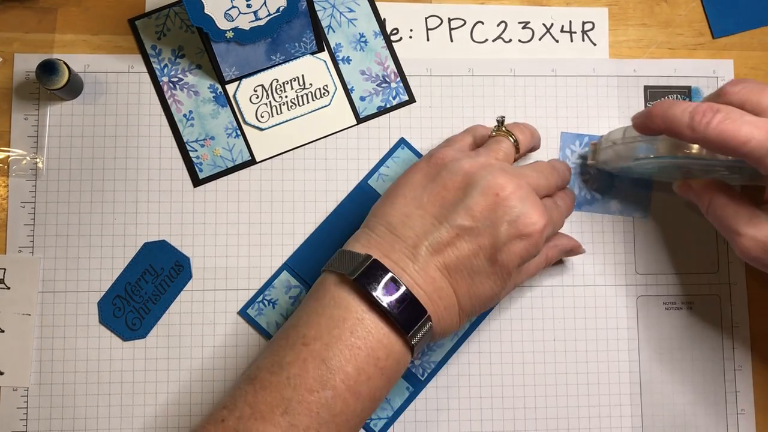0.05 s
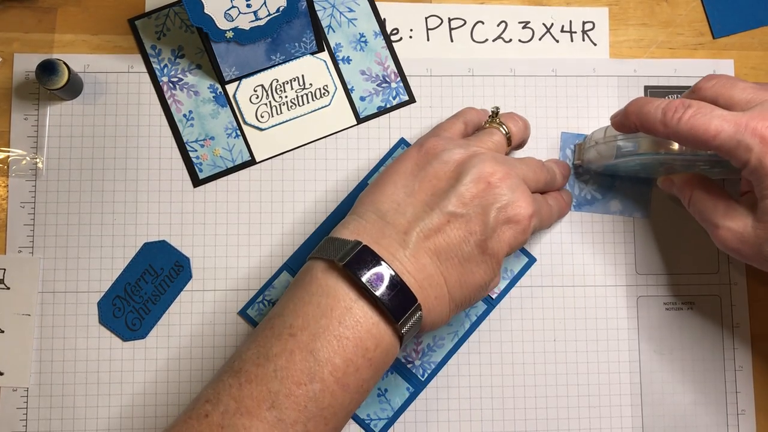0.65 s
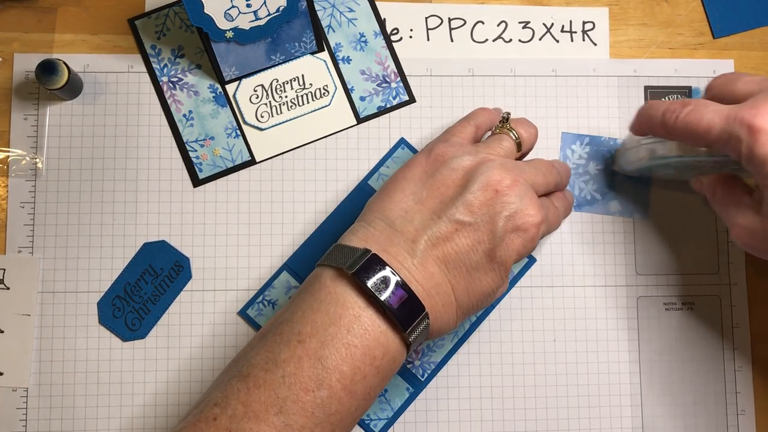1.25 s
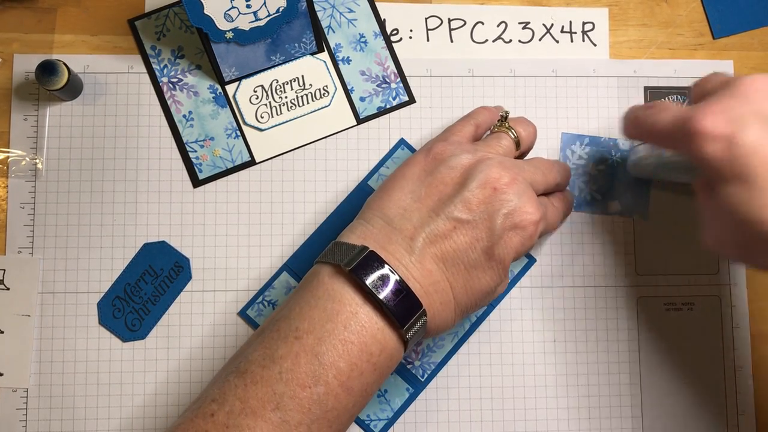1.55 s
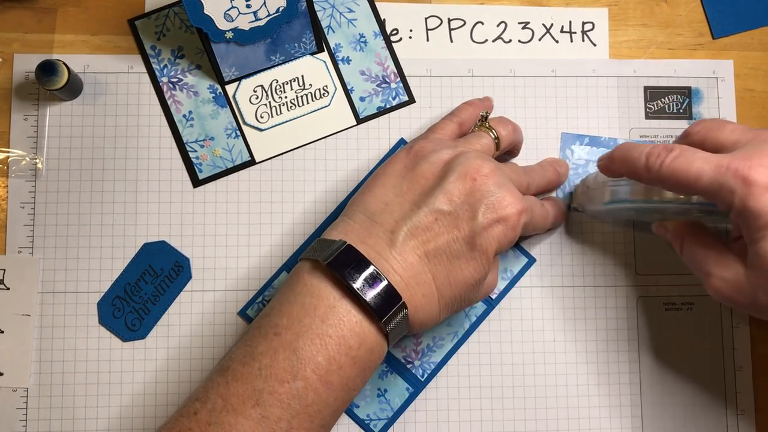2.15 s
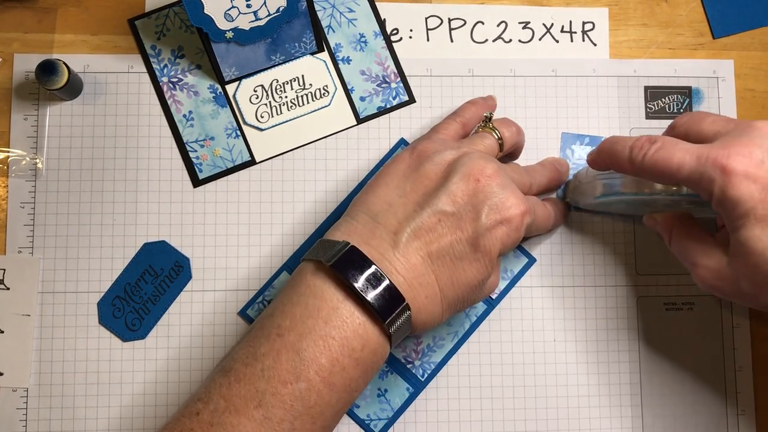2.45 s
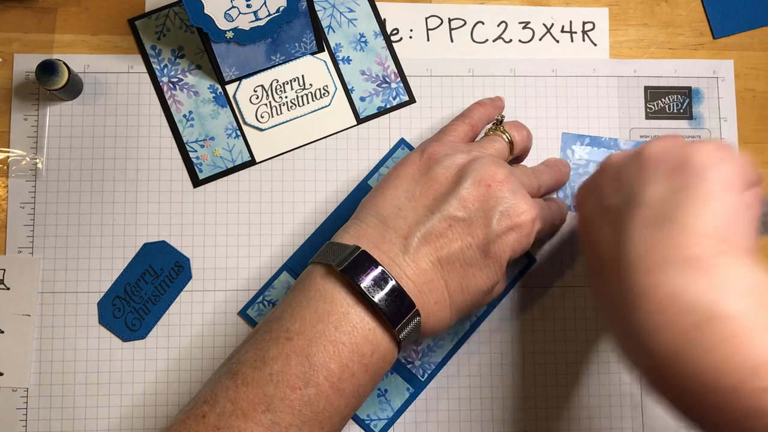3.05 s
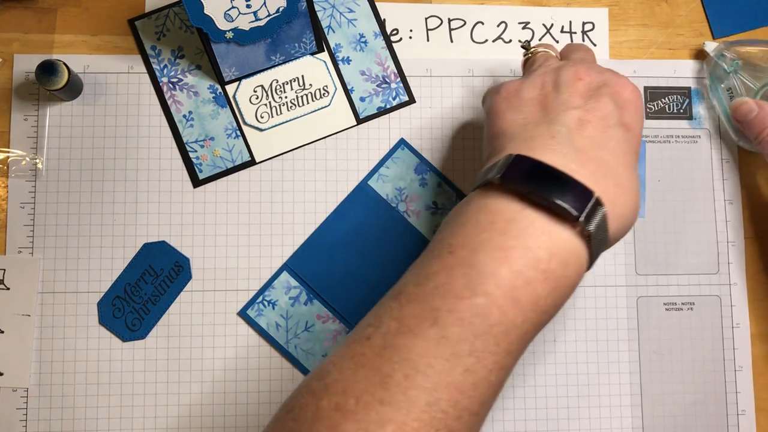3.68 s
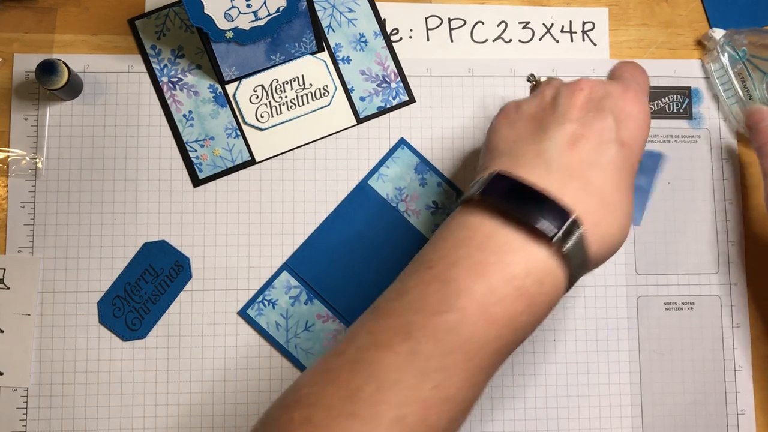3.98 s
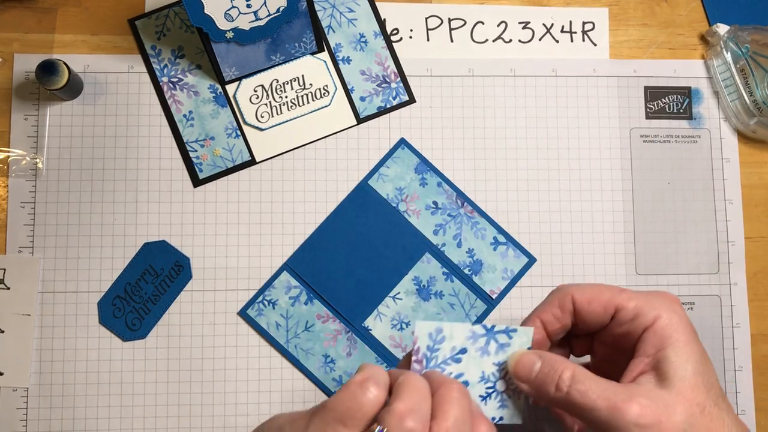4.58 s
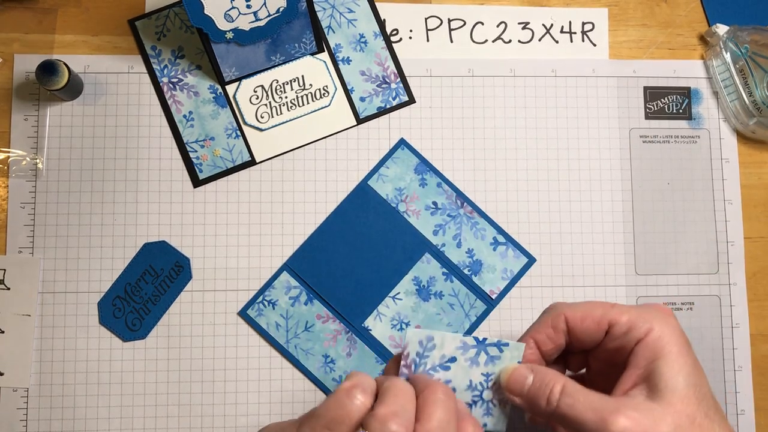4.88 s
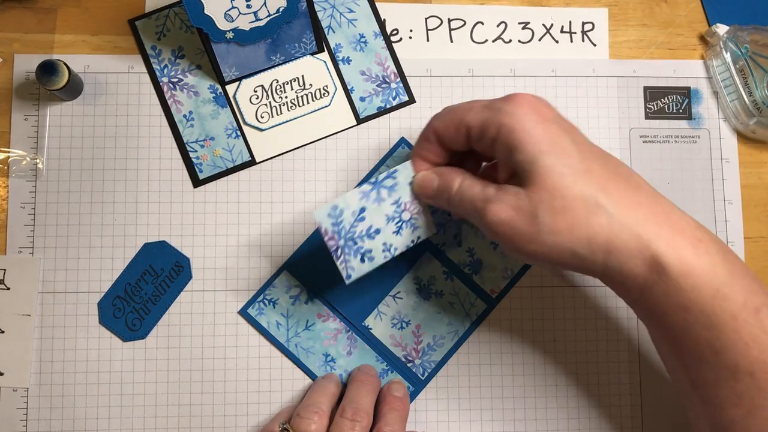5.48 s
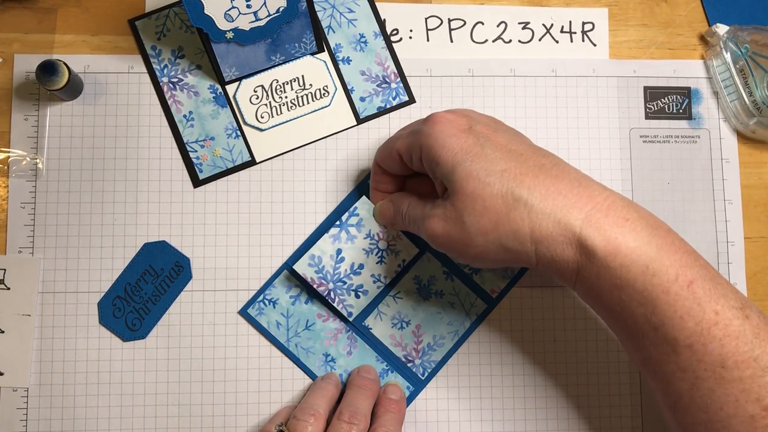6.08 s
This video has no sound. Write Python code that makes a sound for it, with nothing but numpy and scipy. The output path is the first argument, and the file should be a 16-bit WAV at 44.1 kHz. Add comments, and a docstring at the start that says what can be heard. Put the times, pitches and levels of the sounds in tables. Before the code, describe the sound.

A low ventilation hum and faint hiss fill a small quiet room throughout. A very faint, high electrical whine comes on at 0.2 seconds, jumps in pitch, then stays. At about 1.1 seconds a plastic tape runner meets a slip of paper with a soft hollow tock, and glue crackles briefly while the spool ticks. A few sharp little clicks follow around 1.6 seconds. A second, softer stroke comes at 2.5 seconds, then small clicks and a brush of paper at 3. At 3.6 seconds there is a knock on the wooden desk, and just before 4 seconds the runner is put down with a sharp hollow clatter, the loudest sound, rocking briefly. From about 4.5 seconds the paper slides softly in the fingers, flicks at 4.9 and touches down on a card with a light tap at 5.4. Only the background remains until about 6.5 seconds.

```python
"""Card making at a wooden desk in a small quiet room, over ventilation hum and faint hiss.
A faint electrical whine comes on, switches pitch, then stays. At 1.1 s and 2.5 s a plastic tape runner
is drawn over a slip of paper: the tip tocks, glue crackles off the tape, the spool ticks.
From 3.6 s the runner is laid down with a knock on the desk and a clatter of its hollow shell.
Last, the slip is slid off the mat, turned in the fingers and, at 5.4 s, touched down on a card."""
import sys
import numpy as np
from scipy import signal
from scipy.fft import rfft, irfft, next_fast_len
from scipy.io import wavfile
from scipy.ndimage import uniform_filter1d

SR = 44100
rng = np.random.default_rng(int(sys.argv[2]) if len(sys.argv) > 2 else 0)


def bounce(signal):
    """Save signal as a 16-bit WAV file at the path given by the first command-line argument."""
    frames = np.transpose(np.atleast_2d(signal))
    limited = np.clip(frames, -1, 1)
    pcm = np.round(limited * 32767).astype(np.int16)
    wavfile.write(sys.argv[1], SR, pcm)


N = 279153
TIME_S = np.arange(N) / SR

# noise spectra: freq_hz, density_db
VENT_SPECTRUM = [(20, -25), (35, -21.5), (48, -2), (59, 0), (78, -7), (112, -6), (145, -16.5), (260, -20.5),
                 (340, -26.5), (520, -26.5), (950, -21), (2000, -30.5), (2900, -36), (5000, -46),
                 (16000, -74.5)]
HISS_SPECTRUM = [(1000, -4.5), (4900, -7), (5600, 2.5), (7700, -2), (8700, 2.5), (9900, 0), (10500, -9),
                 (11300, -3.5), (12600, 2.5), (16000, -1.5)]
SLIDE_SPECTRUM = [(300, -3.5), (1500, 2.5), (4000, -2.5), (7000, 0), (10000, -4.5), (16000, -10)]
PEEL_SPECTRUM = [(150, 4.5), (450, 2), (1000, -16.5), (2500, -3.5), (4300, -7.5), (6300, -1.5), (10000, -5),
                 (16000, -7)]
# electrical whine steps: start_s, pitch_hz
WHINE_STEPS = [(0.191, 15400), (.283, 12100), (.368, 15400), (.454, 11350)]
# room decay: freq_hz, t60_s
ROOM_DECAY = [(100, 0.51), (500, 0.43), (2000, 0.322), (6000, .35), (15000, 0.41)]
# room tail spectrum: freq_hz, gain_db
ROOM_SPECTRUM = [(80, 8.5), (400, -5.5), (1500, -2), (4000, -7.5), (8000, -14), (16000, -14)]

# paper and skin sliding: centre_s, length_s, level_db
SLIDES = [(0.24, 0.042, -74), (1.913, 0.072, -74), (3.023, 0.0206, -52), (3.327, 0.117, -72.5),
          (3.416, 0.0158, -59), (3.677, 0.045, -59.5), (3.892, 0.114, -61), (4.473, 0.0643, -65.5),
          (4.613, 0.032, -71.5), (4.707, 0.027, -72), (4.923, .029, -66), (5.456, 0.0266, -63.5)]
# runner drawn over the paper: start_s, length_s, level_db
STROKES = [(1.148, 0.177, -62.5), (2.538, 0.238, -72)]
# impacts: start_s, level_db, lowpass_hz
PAPER_FLICKS = [(4.9212, -52.5, 9000), (4.9242, -56.5, 8900), (5.4272, -44, 4595), (5.4445, -52.5, 2470)]
SHELL_CLACKS = [(1.1684, -41.5, 5540), (1.1827, -49, 3100), (1.613, -53.5, 2600), (3.9023, -49, 5000),
                (3.9362, -40.5, 3500), (3.9475, -17, 11100), (3.9535, -30, 14000), (3.9702, -30, 8000),
                (3.9893, -33.5, 5440), (4.0468, -34, 6500), (4.1038, -40.5, 6340)]
DESK_KNOCKS = [(3.5572, -26.5, 4997), (3.5755, -39, 896), (3.7, -39, 1140), (3.9495, -35, 2000),
               (4.0035, -29, 1576)]
TIP_PRESSES = [(1.1416, -39, 2500), (1.172, -48, 1470), (1.6262, -60.5, 2490), (2.6072, -59, 1500),
               (3.0285, -52.5, 1500)]   # onto and off the mat
RUNNER_TICKS = [(.907, -56.5, 8970), (1.1562, -54.5, 10900), (1.4083, -55.5, 13700), (1.5377, -54, 14000),
                (1.5997, -54, 7900), (1.625, -41, 12870), (1.6277, -43.5, 12800), (1.6364, -45.5, 11000),
                (1.9294, -61, 8950), (2.5083, -52, 17100), (2.5355, -48.5, 15000), (2.6068, -46.5, 7800),
                (3.0183, -51.5, 11000), (3.0336, -48, 8540), (3.5516, -49.5, 8000), (4.1237, -53.5, 14000)]   # spool and tip
# ringing modes: freq_hz, gain_db, t60_s
CARD_MODES = [(740, -17, 0.032), (1530, -7, 0.028), (2853, -0.5, 0.0063), (3980, 4, 0.012)]
SHELL_MODES = [(395, -19, 0.045), (527, -10, 0.06), (1329, -11, 0.035), (1558, -11, 0.027),
               (3932, -4.5, 0.019), (4270, -12.5, 0.021), (5097, -6, 0.017), (5450, -2.5, 0.016),
               (6522, 4, 0.011), (6610, -2, 0.011), (8337, 0.5, .015), (9570, -5, 0.015),
               (11000, -18, 0.029)]
DESK_MODES = [(103.9, -16, 0.1485), (266, -12.5, 0.047), (355.9, -6.5, .08), (495.3, -5.5, 0.07),
              (1194.6, -13, 0.048), (1441, -15.5, 0.036), (2210, -3, .028), (4200, -1.5, 0.01242)]
TIP_MODES = [(440.4, -4.5, 0.057), (544.4, 10.5, 0.0246), (1057, -2, 0.0406)]
SPOOL_MODES = [(2634, -20.5, 0.0053), (5298, -11, 0.022), (6580, 2, 0.00574), (9400, -22.5, 0.0034),
               (11050, -16.5, 0.0025), (14080, -9.5, 0.0044)]
# impact crack spectra: freq_hz, density_db
CARD_CRACK = [(300, -15.5), (1300, 1.5), (2100, -3), (2800, 1), (4200, -0.5), (6000, 1), (9000, -20),
              (16000, 1)]
SHELL_CRACK = [(150, -14), (450, -3.5), (780, -10.5), (1650, -0.5), (2700, -5.5), (4000, 0.5), (5700, -6.5),
               (6800, -4.5), (8500, -1.5), (10500, -7.5), (16000, -7)]
DESK_CRACK = [(80, -13), (170, -5.5), (330, 4), (520, 2.5), (760, -5.5), (1100, -0.5), (1400, -5),
              (2100, -1), (2900, -7.5), (4000, -2), (5000, -10.5), (9000, -8), (16000, -3.5)]
TIP_CRACK = [(150, -19.5), (500, 0), (1000, 0.5), (2000, -5.5), (3400, -1), (5000, -14), (16000, -20)]
SPOOL_CRACK = [(300, -7), (1500, -9), (3200, -1), (4700, -7), (6200, 0), (8500, 3.5), (12000, 5),
               (16000, 3)]


def from_db(db):
    """Decibels to gain."""
    return 10 ** (np.asarray(db) / 20)


def unit_rms(x):
    """Scale to unit power."""
    return x / np.sqrt(np.mean(x ** 2) + 1e-20)


def at_hz(table, hz):
    """Interpolate a table over log frequency."""
    known_hz, values = np.transpose(table)
    return np.interp(np.log(np.maximum(hz, 1)), np.log(known_hz), values)


def lowpass(x, cutoff_hz):
    """Second-order low-pass."""
    return signal.sosfilt(signal.butter(2, min(cutoff_hz, .45 * SR), fs=SR, output="sos"), x)


def noise(spectrum):
    """Unit-power noise with the given spectrum."""
    size = next_fast_len(N)
    gain = from_db(at_hz(spectrum, np.fft.rfftfreq(size, 1 / SR)))
    return unit_rms(irfft(rfft(rng.standard_normal(size)) * gain, size)[:N])


def background(vent_db, hiss_db):
    """Steady ventilation rumble and faint microphone hiss."""
    return from_db(vent_db) * noise(VENT_SPECTRUM) + from_db(hiss_db) * noise(HISS_SPECTRUM)


def whine(level_db, half_width_hz, leap_hz, pulse_db):
    """Narrow noise band from electronics; pulses at two rates, leaps up in pitch at random."""
    starts_s, steps_hz = np.transpose(WHINE_STEPS)
    pitch_hz = steps_hz[np.searchsorted(starts_s, TIME_S) - 1]
    pulse = np.sin(2 * np.pi * 30 * TIME_S) + np.sin(2 * np.pi * 43 * TIME_S)
    leap = np.maximum(unit_rms(lowpass(rng.standard_normal(N), 70)), 0) ** 2
    phase = 2 * np.pi * np.cumsum(pitch_hz + leap_hz * leap) / SR
    band = lowpass(rng.standard_normal(N), half_width_hz) * np.sin(phase)
    return from_db(level_db) * (TIME_S > starts_s[0]) * unit_rms(band * from_db(pulse_db * pulse))


def room(x, tail_db, build_s, ceiling_s, ceiling_db, ceiling_hz):
    """Direct sound, one ceiling echo and a diffuse tail that lasts longest in the bass."""
    t_s = TIME_S[:SR // 2]
    white = rng.standard_normal((2, len(t_s))) / np.sqrt(SR)
    edges_hz = np.geomspace(60, 17000, 13)
    tail = 0
    for k, (low_hz, high_hz) in enumerate(zip(edges_hz, edges_hz[1:])):
        bandpass = signal.butter(2, [low_hz, high_hz], "band", fs=SR, output="sos")
        centre_hz = np.sqrt(low_hz * high_hz)
        envelope_db = at_hz(ROOM_SPECTRUM, centre_hz) - 60 * t_s / at_hz(ROOM_DECAY, centre_hz)
        tail += signal.sosfilt(bandpass, white[k % 2]) * from_db(envelope_db)
    diffuse = signal.fftconvolve(x, tail * (1 - np.exp(-t_s / build_s)))[:N]
    echo = np.interp(TIME_S - ceiling_s, TIME_S, lowpass(x, ceiling_hz), left=0)
    return x + from_db(tail_db) * diffuse + from_db(ceiling_db) * echo


def crack(spectrum, t60_s, size):
    """Dense, heavily damped modes: a dying noise burst, flattened, then shaped to the spectrum."""
    hz = np.fft.rfftfreq(2 * size, 1 / SR)
    burst = rfft(rng.standard_normal(size) * from_db(-60 * TIME_S[:size] / t60_s), 2 * size)
    local_rms = np.sqrt(uniform_filter1d(np.abs(burst) ** 2, size=size // 50))
    flat = burst / unit_rms(local_rms)
    return irfft(flat * unit_rms(from_db(at_hz(spectrum, hz))))[:size]


def strikes(impacts, modes, crack_spectrum, crack_db, crack_t60_s, rise_s, gain_spread, detune):
    """Each blow cracks and rings every mode; grip and contact point vary mode strength and pitch."""
    t_s = TIME_S[:SR // 4]
    mode_hz, mode_db, t60_s = np.transpose(modes)[:, :, None]
    out = np.zeros(N + len(t_s))
    for start_s, level_db, lowpass_hz in impacts:
        gain = from_db(mode_db) * np.exp(gain_spread * rng.standard_normal(mode_hz.shape))
        gain *= rng.choice([-1, 1], mode_hz.shape)
        pitch_hz = mode_hz * (1 + detune * rng.standard_normal(mode_hz.shape))
        ring = np.sum(gain * np.sin(2 * np.pi * pitch_hz * t_s) * from_db(-60 * t_s / t60_s), axis=0)
        body = ring + from_db(crack_db) * crack(crack_spectrum, crack_t60_s, len(t_s))
        blow = lowpass(body * (1 - np.exp(-t_s / rise_s)), lowpass_hz)   # softer contact, less treble
        rms_5ms = np.sqrt(np.sum(blow ** 2) / (SR // 200))   # whole energy over 5 ms
        start = round(start_s * SR)
        out[start:start + len(t_s)] += from_db(level_db) * blow / rms_5ms
    return out[:N]


def friction(spectrum, slips_per_s, spread_db, puff_t60_s, smooth_db):
    """Tiny uneven slips, each a puff of noise, over a smooth hiss; unit power."""
    slips = (rng.random(N) < slips_per_s / SR) * from_db(spread_db * np.minimum(rng.exponential(1, N), 4))
    puffs = signal.lfilter([1], [1, -from_db(-60 / (puff_t60_s * SR))], slips + 1e-18)
    return unit_rms(noise(spectrum) * (unit_rms(puffs) + from_db(smooth_db)))


def paper():
    """Slides swell and fade with hand speed; the stiff edge flicks and touches down."""
    speed = sum(from_db(level_db) * np.exp(-2 * ((TIME_S - centre_s) / length_s) ** 2)
                for centre_s, length_s, level_db in SLIDES)
    rub = friction(SLIDE_SPECTRUM, slips_per_s=700, spread_db=3.5, puff_t60_s=0.003, smooth_db=0.5)
    flicks = strikes(PAPER_FLICKS, CARD_MODES, CARD_CRACK, crack_db=5.5, crack_t60_s=0.0241,
                     rise_s=0.0001, gain_spread=0.123, detune=0.0147)
    return speed * rub + flicks


def tape_peel(attack_s, grab_db, grab_s, release_db_per_s):
    """Glue crackles hard as it grabs, settles to an even pull, dies away when the hand stops."""
    pull = 0
    for start_s, length_s, level_db in STROKES:
        age_s = np.maximum(TIME_S - start_s, 0)
        boost_db = grab_db * np.exp(-(age_s / grab_s) ** 2)
        release_db = release_db_per_s * np.maximum(age_s - length_s, 0)
        pull += np.minimum(age_s / attack_s, 1) * from_db(level_db + boost_db - release_db)
    return pull * friction(PEEL_SPECTRUM, slips_per_s=600, spread_db=-2, puff_t60_s=0.0027, smooth_db=1.5)


def spool_ratchet(ticks_per_s, above_pull_db, spread_db, lowpass_hz):
    """Impact rows for the spool, ticking unevenly while the tape runs."""
    ticks = []
    for start_s, length_s, pull_db in STROKES:
        lateness, strength = rng.standard_normal((32, 2)).T
        ages_s = (np.arange(1, 33) + lateness / 4) / ticks_per_s
        levels_db = pull_db + above_pull_db + spread_db * strength
        ticks += [(start_s + age_s, level_db, lowpass_hz)
                  for age_s, level_db in zip(ages_s, levels_db) if age_s < length_s]
    return ticks


def tape_runner():
    """The tip lands with a hollow tock; tape peels while the spool ticks."""
    tip = strikes(TIP_PRESSES, TIP_MODES, TIP_CRACK, crack_db=12.5, crack_t60_s=0.0089,
                  rise_s=0.00057, gain_spread=0.146, detune=0.0145)
    peel = tape_peel(attack_s=0.015, grab_db=12, grab_s=0.0538, release_db_per_s=253.5)
    ticks = RUNNER_TICKS + spool_ratchet(ticks_per_s=41, above_pull_db=2.5, spread_db=2, lowpass_hz=10000)
    spool = strikes(ticks, SPOOL_MODES, SPOOL_CRACK, crack_db=8, crack_t60_s=0.0089,
                    rise_s=0.000063, gain_spread=0.18, detune=0.0393)
    return tip + peel + spool


def runner_on_desk():
    """The hollow shell hits and rocks; the desk top answers lower."""
    shell = strikes(SHELL_CLACKS, SHELL_MODES, SHELL_CRACK, crack_db=7, crack_t60_s=0.014,
                    rise_s=0.00028, gain_spread=0.15, detune=0.0065)
    desk = strikes(DESK_KNOCKS, DESK_MODES, DESK_CRACK, crack_db=12, crack_t60_s=0.0243,
                   rise_s=0.00027, gain_spread=0.14, detune=0.008)
    return shell + desk


def scene():
    """Handling sounds in the room, over hum, hiss and whine; mono."""
    handling = tape_runner() + runner_on_desk() + paper()
    mix = room(handling, tail_db=12.5, build_s=0.004, ceiling_s=0.016, ceiling_db=-13.5, ceiling_hz=6130)
    mix += background(vent_db=-56, hiss_db=-78)
    mix += whine(level_db=-81, half_width_hz=320, leap_hz=640, pulse_db=4.5)
    return mix[None]


def record(dry):
    """Steep low-pass at 16.2 kHz."""
    return signal.sosfilt(signal.ellip(10, .2, 70, 16200, fs=SR, output="sos"), dry)


dry = scene()
out = record(dry)
bounce(out)
```